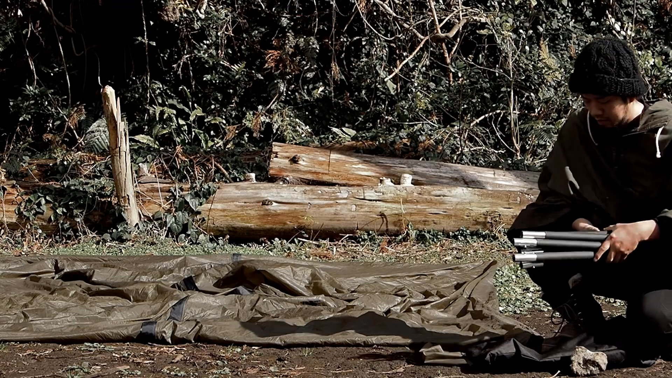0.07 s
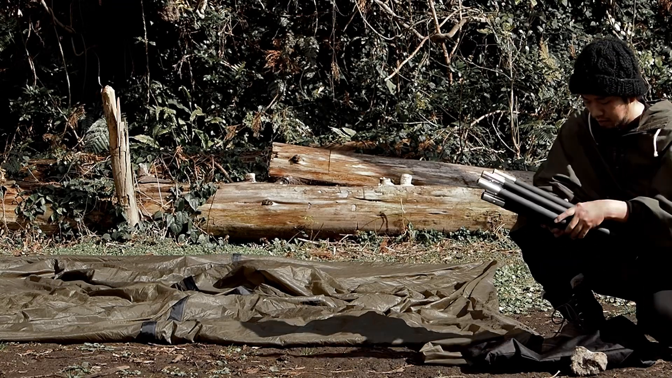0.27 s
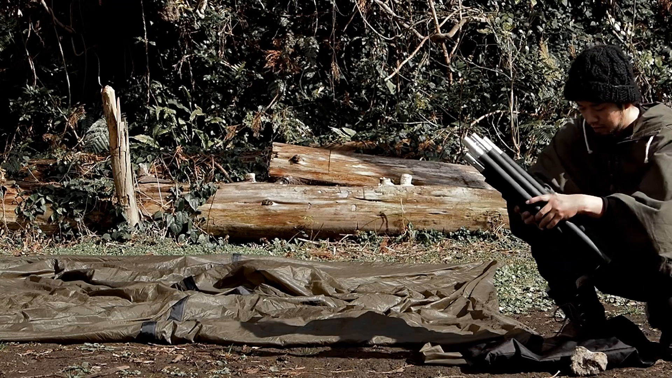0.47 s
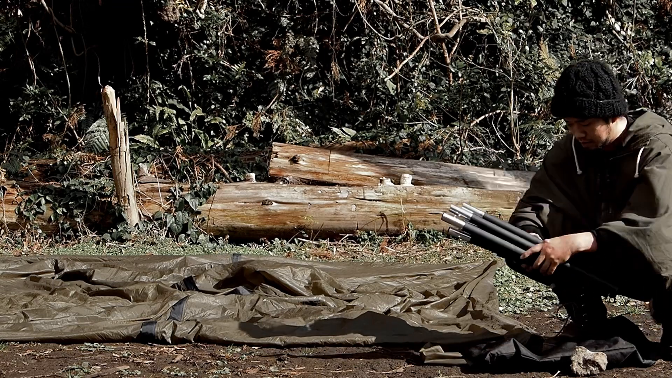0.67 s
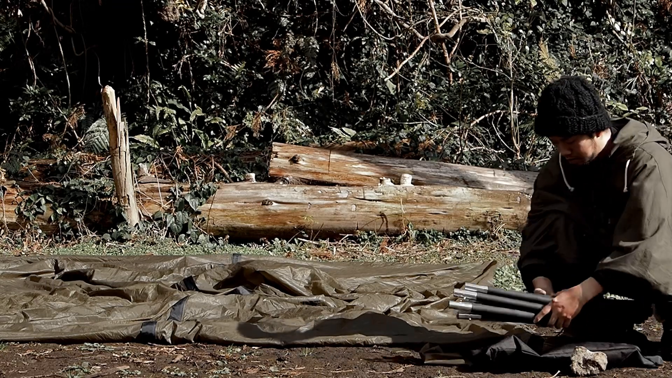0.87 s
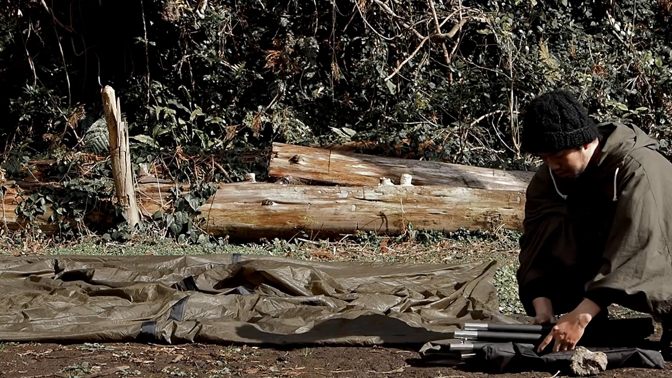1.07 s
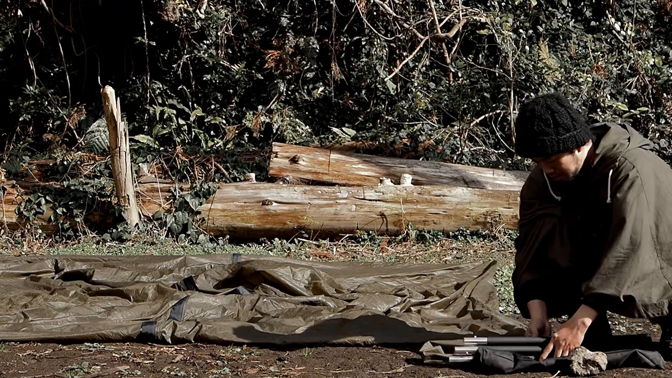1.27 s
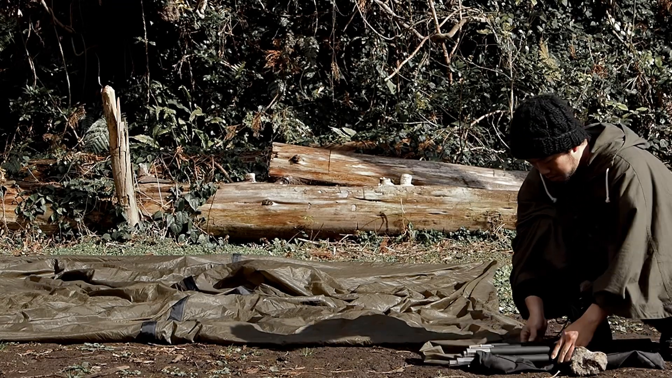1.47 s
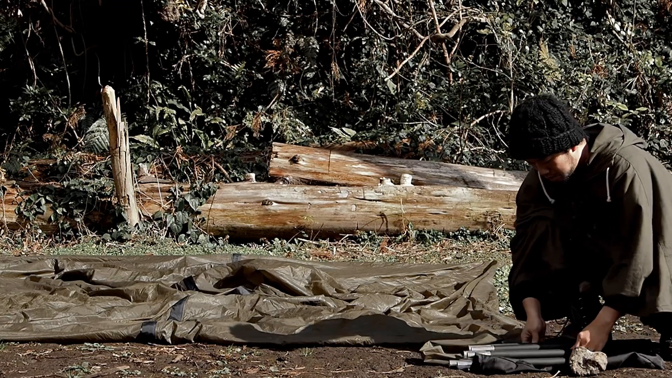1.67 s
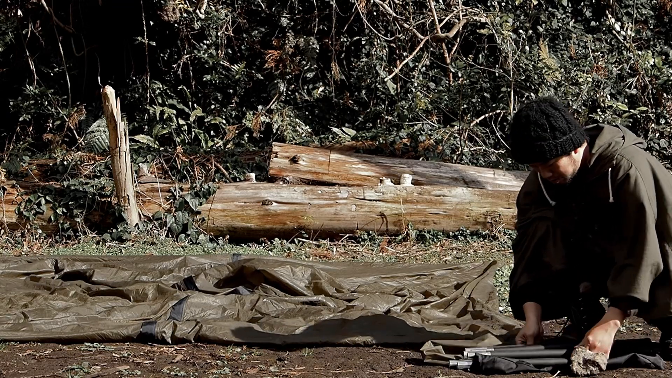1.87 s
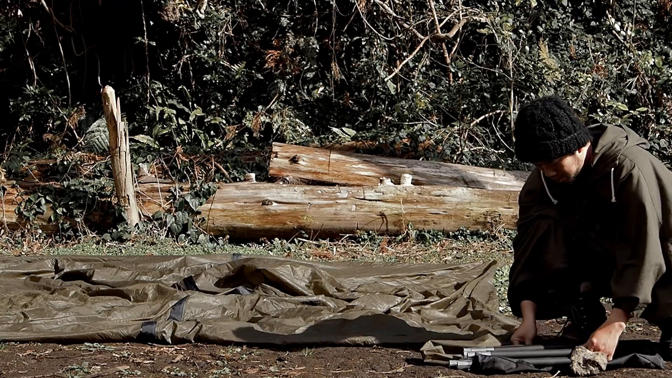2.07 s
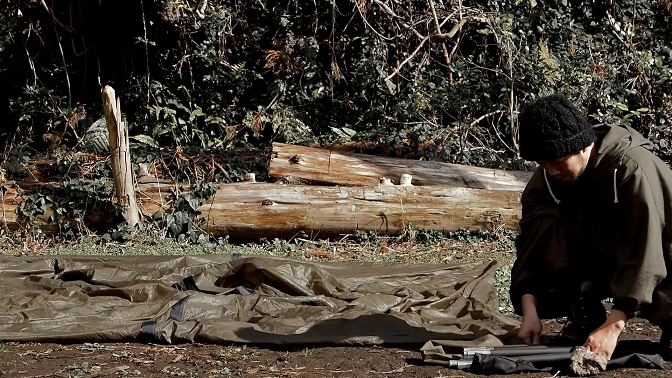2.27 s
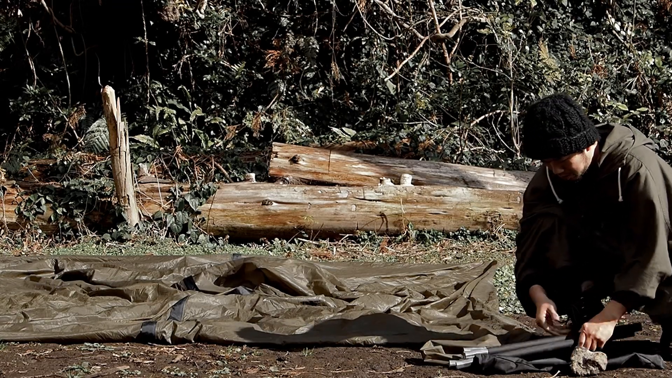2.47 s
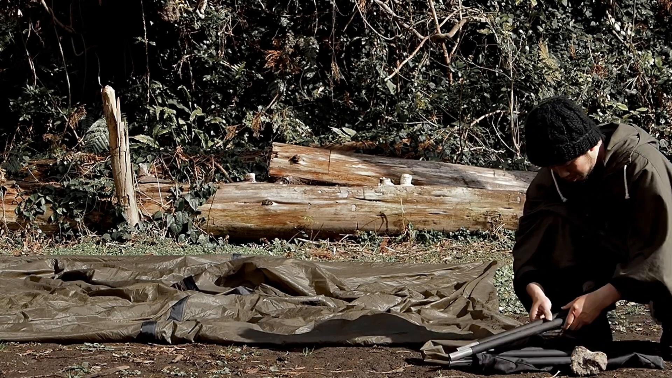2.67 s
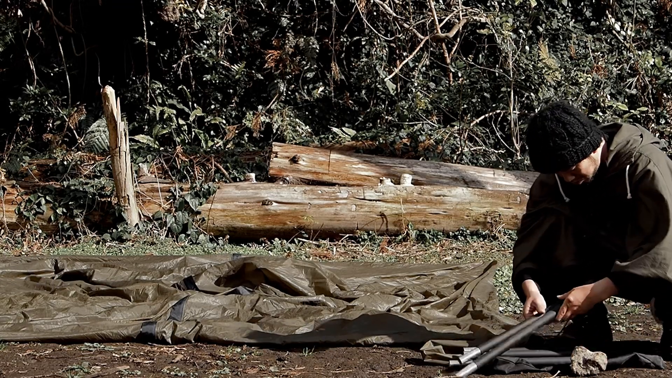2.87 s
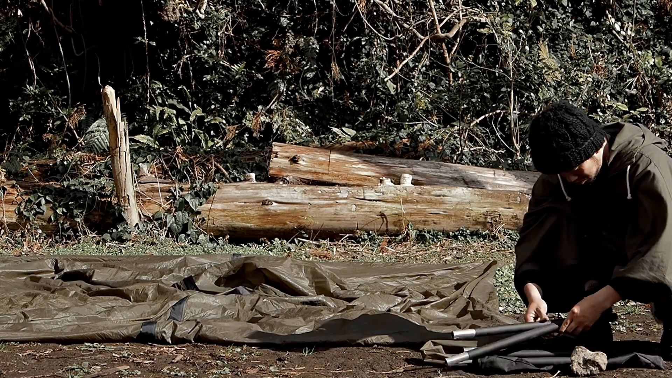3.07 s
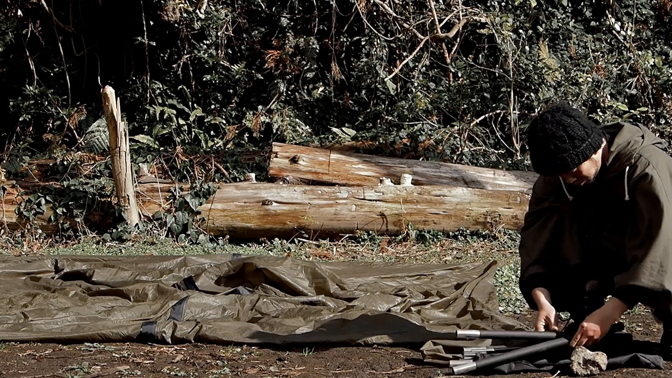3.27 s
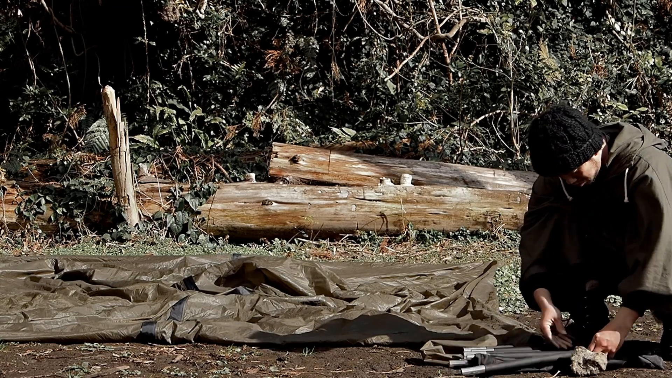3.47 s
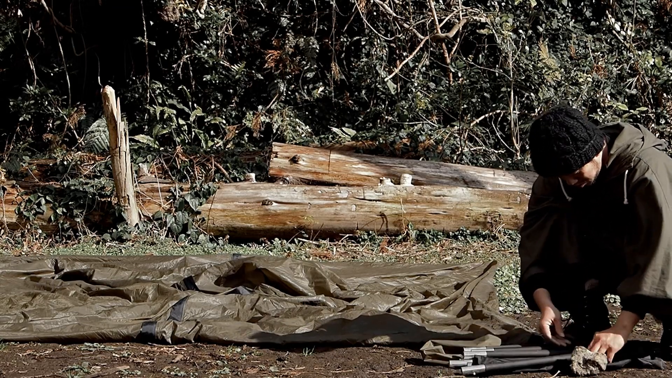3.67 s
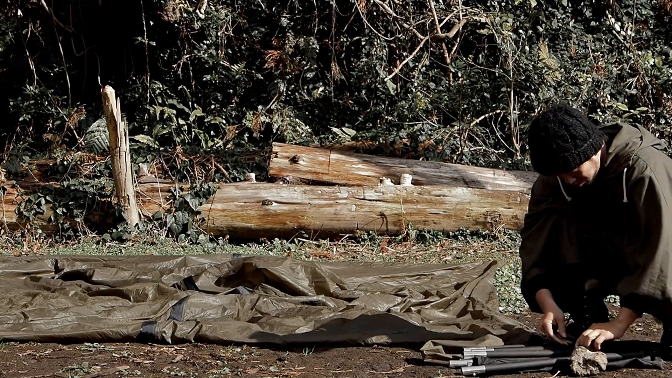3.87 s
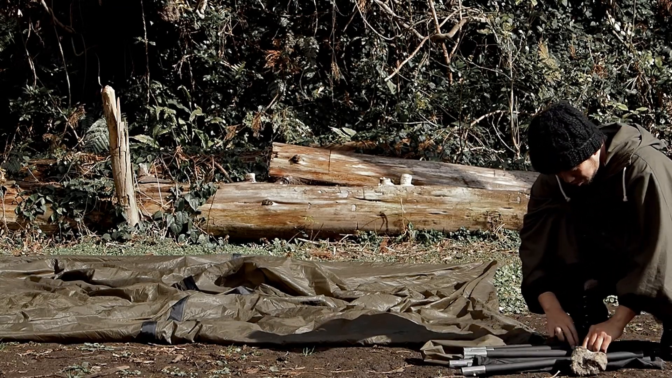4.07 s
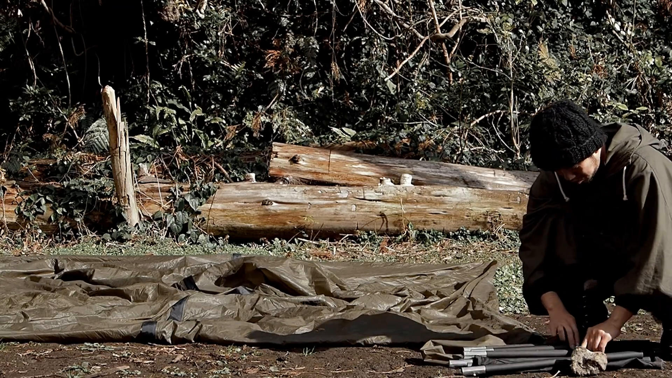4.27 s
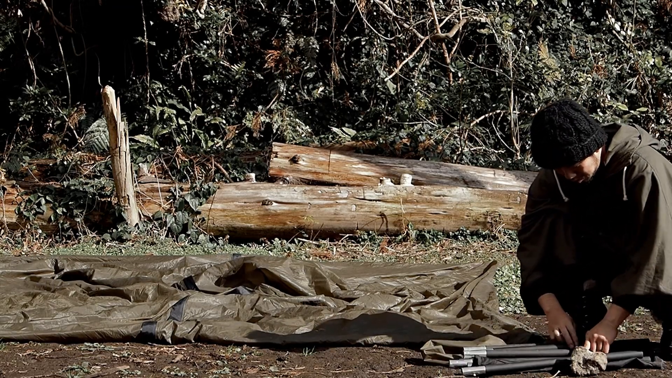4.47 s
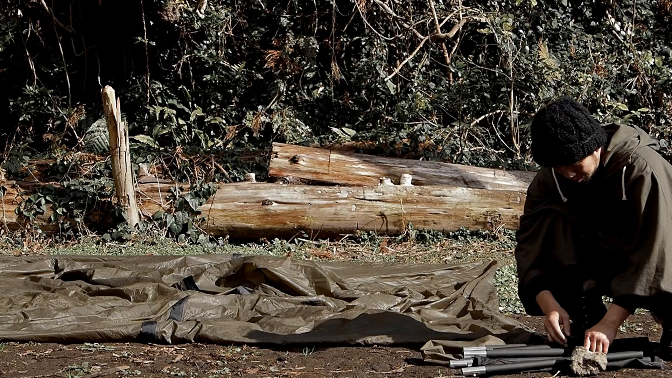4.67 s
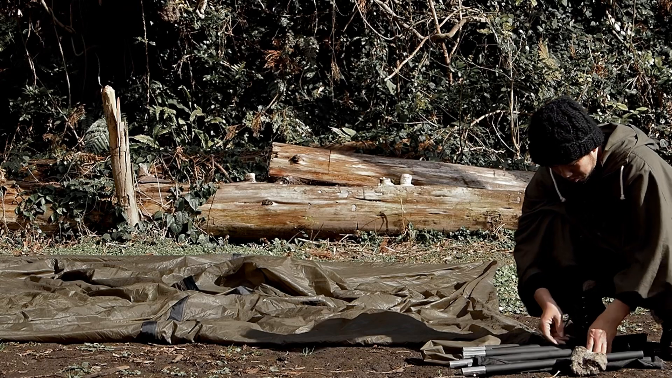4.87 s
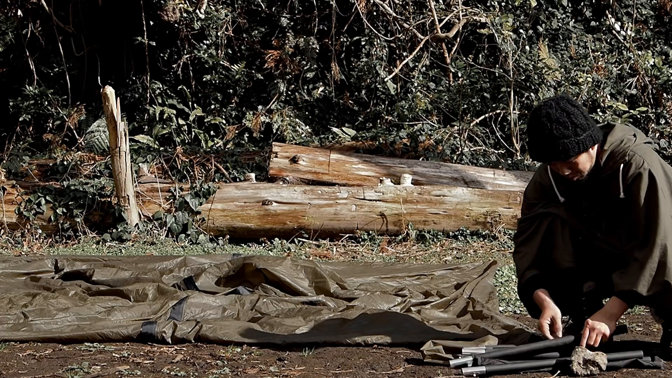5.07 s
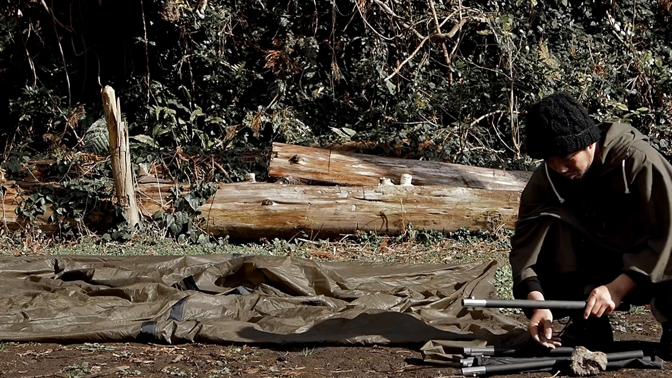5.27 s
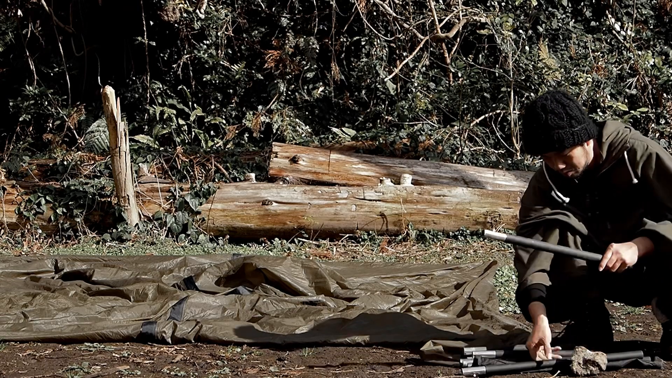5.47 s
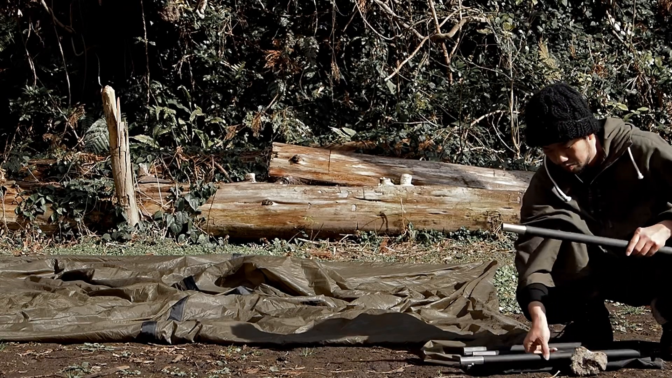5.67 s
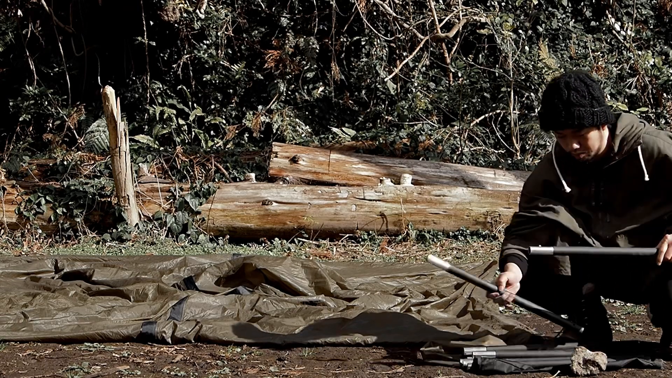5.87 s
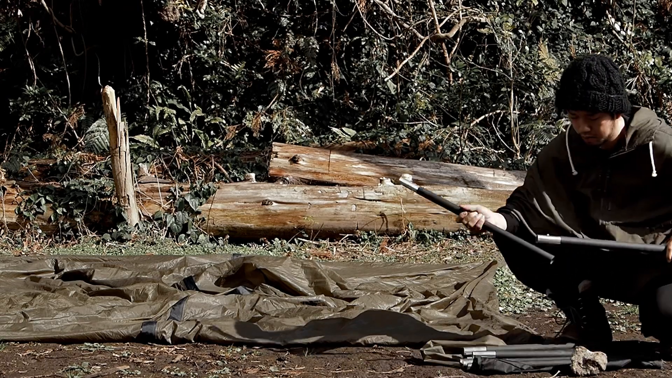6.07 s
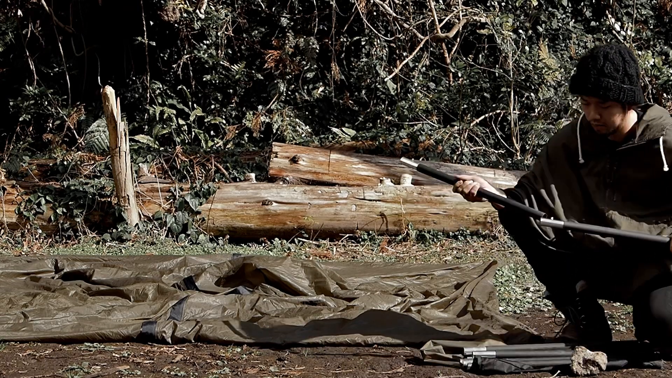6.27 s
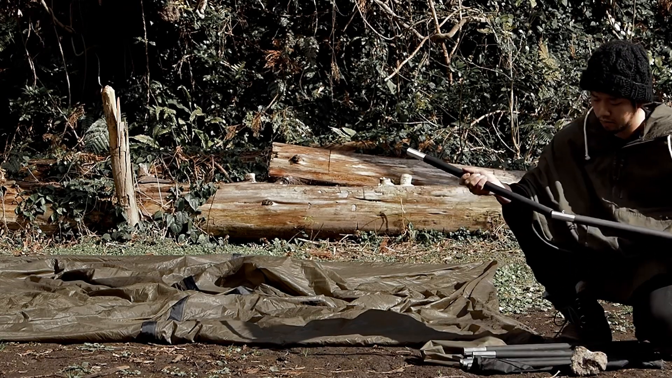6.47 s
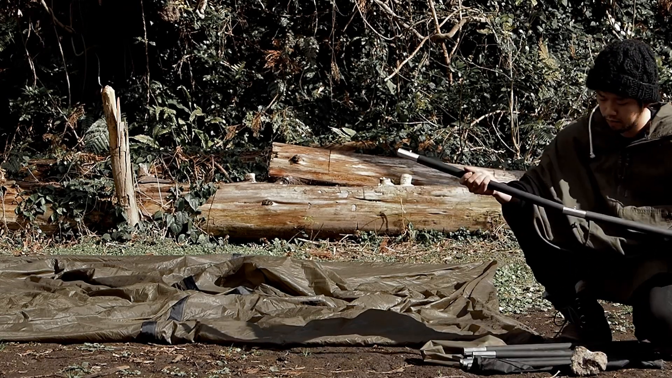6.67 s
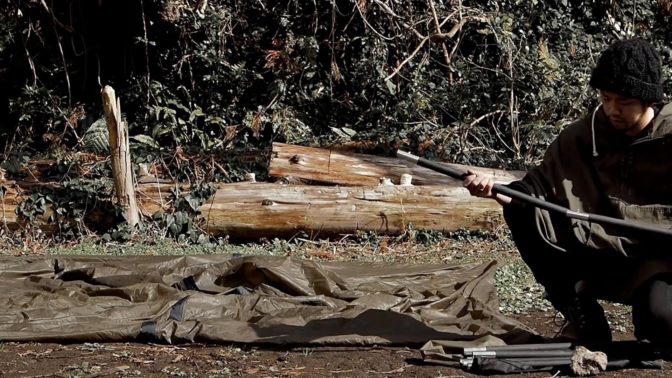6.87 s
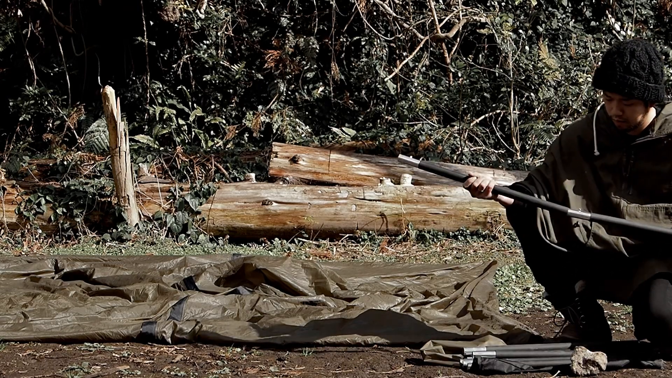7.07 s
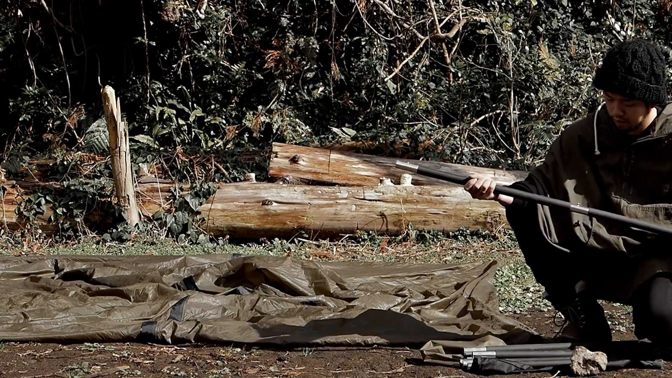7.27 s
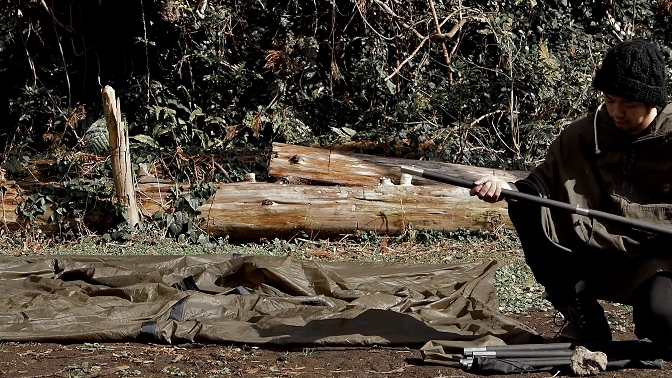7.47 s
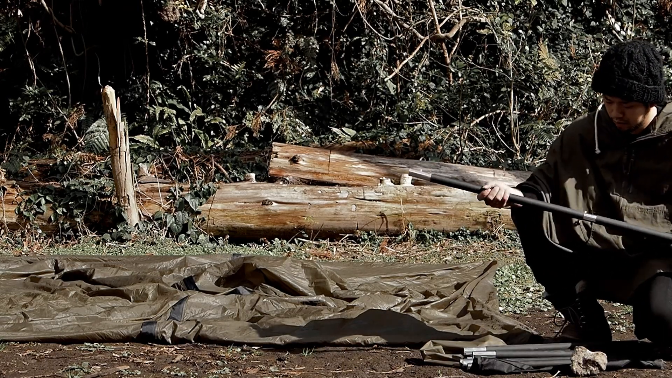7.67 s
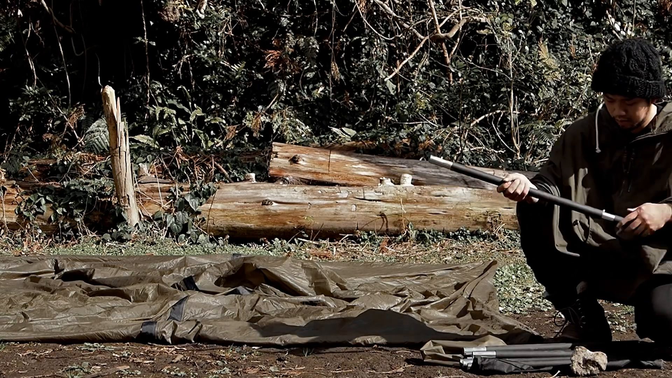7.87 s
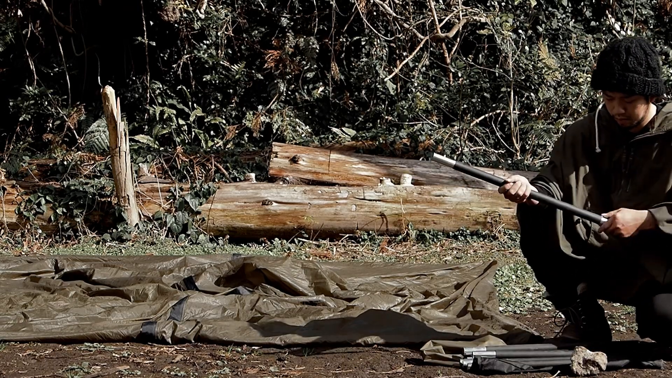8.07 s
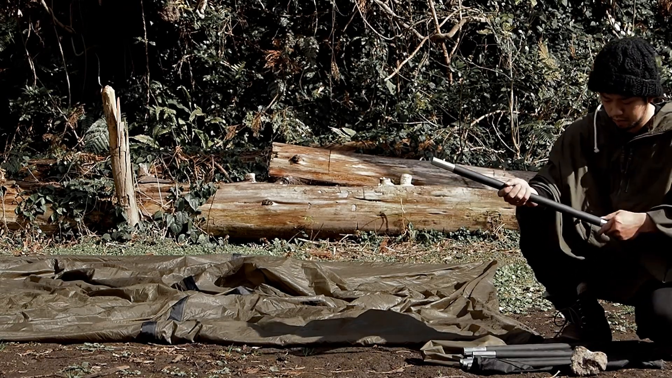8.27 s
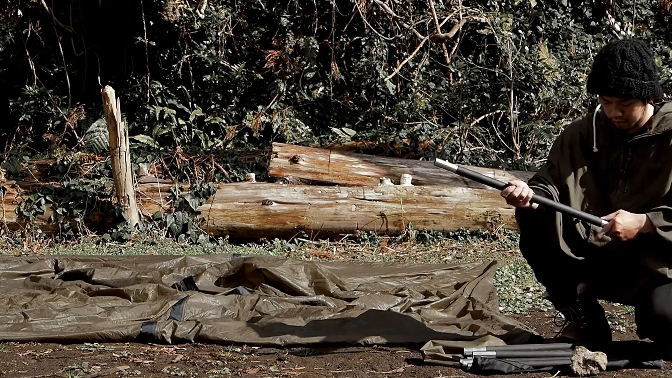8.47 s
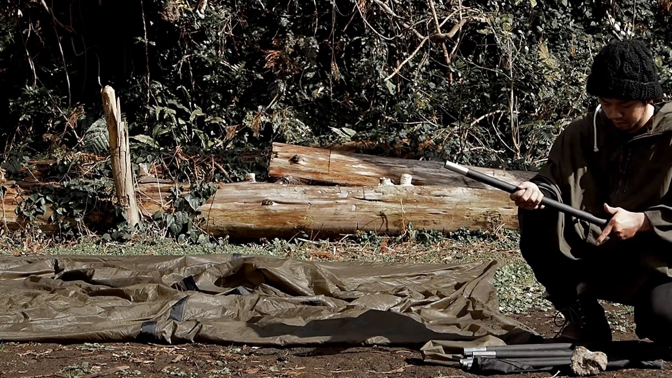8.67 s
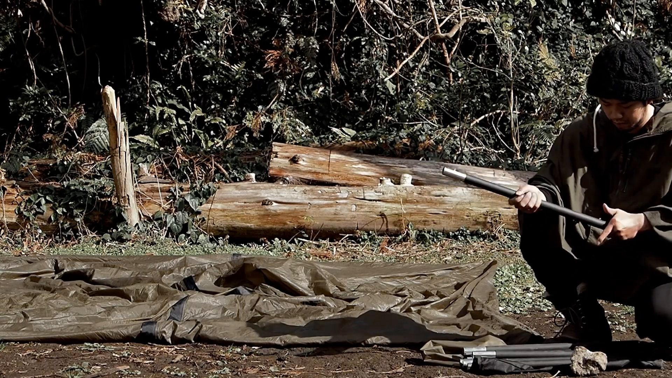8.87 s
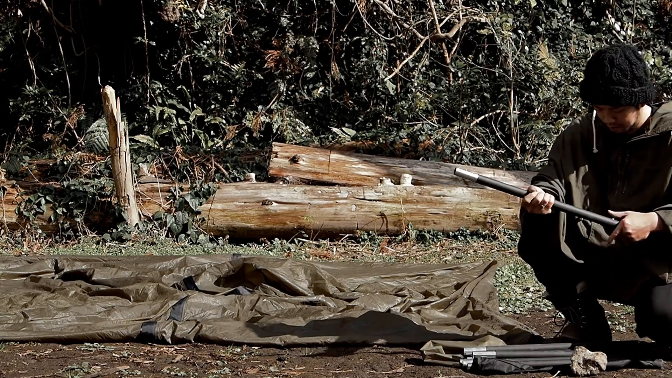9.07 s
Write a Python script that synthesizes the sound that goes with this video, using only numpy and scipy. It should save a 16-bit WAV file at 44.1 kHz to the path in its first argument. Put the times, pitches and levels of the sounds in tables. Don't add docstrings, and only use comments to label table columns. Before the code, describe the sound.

A bundle of thin metal tubes shifts in the hand, then clatters down on cloth-covered ground in a dense, choked rattle. Sparse clinks and rubbing follow as tubes are picked apart, some ringing brightly. Later come faint taps, a dry sliding hiss and sharp joint snaps. A close stereo microphone hears the tubes slightly right, with low wind thumps and soft woodland hiss.

```python
import sys
import numpy as np
from scipy import signal
from scipy.fft import rfft, irfft, next_fast_len
from scipy.io import wavfile
from scipy.ndimage import uniform_filter1d

SR = 44100
rng = np.random.default_rng(int(sys.argv[2]) if len(sys.argv) > 2 else 0)


def gain_from_db(level_db):
    decades = np.asarray(level_db, float) / 20
    return 10 ** decades


def transcribe(signal):
    frames = np.atleast_2d(signal).T
    limited = np.clip(frames, -1, 1)
    pcm = np.round(limited * 32767).astype(np.int16)
    wavfile.write(sys.argv[1], SR, pcm)


N = 402191

# hz, density_db
FLOOR_SPECTRUM = [(35, -33), (60, -22), (199, -7), (290, -2.5), (497, -10.5), (1160, -5.5), (1770, -13.5),
                  (3040, -5), (4030, -9), (10100, -16), (11300, -19.5), (13700, -19.5), (15400, -23.5),
                  (16500, -42)]
# hz, correlation (0 to 1)
FLOOR_LIKENESS = [(100, 0.97), (290, 0.99), (640, 0.63), (1400, 0.22), (3000, 0)]

# peak_s, level_db, fall_s (time to die by 20 dB)
CLOTH_DRAGS = [(0, -73.5, 0.24), (.18, -68, -1), (.49, -80, 1.5), (0.959, -61.5, 0.15), (1.21, -58, 0.37),
               (1.36, -62, 0.6), (1.51, -85, 0.5), (1.92, -71, 0.1), (2.29, -79, 0.64), (2.59, -67.5, 0.35),
               (2.82, -61.5, -0.03), (3.24, -72.5, 0.22), (3.56, -68, 0.3), (3.79, -60, 0),
               (4.37, -83.5, 3.5), (4.81, -67, 0.48), (5.068, -62, 0.39), (5.25, -61, 0.16),
               (5.5, -81, 0.43), (7.47, -72, 0.05), (8.62, -70.5, 0.52)]
# hz, gain_db
CLOTH_COLOUR = [(150, -2), (400, 14), (800, 3.5), (2000, -3.5), (6000, 5.5), (9000, 1.5), (14500, -6)]

# peak_s, level_db, rise_s, fall_s (times over 20 dB)
GRIP_SHIFTS = [
    (.018, -45.5, 5.5, 0.03),
    (.165, -63, 0.1, 0.1),
    (.185, -68, 0.5, -0.35),
    (.28, -82, -9, 12),
    (.485, -62, 0.14, 0.04),
    (7.25, -62, 0.07, .012),
    (7.296, -60, 0.04, 0),
    (7.453, -63, .02, -0.04),
    (4.705, -57, 0.38, 0.06),
]
# pitch_hz, level_db, t60_s
GRIPPED_MODES = [(1550, -2.5, 0.011), (2530, -6, 0.015), (2810, 1.5, 0.015), (3050, -8, 0.016),
                 (3960, -16.5, 0.018), (5490, -8.5, 0.011)]

# peak_s, level_db, rise_s, fall_s (times over 20 dB)
LEFT_PORT_GUSTS = [(.06, -50.5, 0.11, 0.06), (2.02, -54, 0.28, 0.36), (2.33, -45.5, 0.15, 0.19),
                   (2.74, -40, 0.072, 0.17), (3.06, -49.5, 0.12, 0.12), (3.24, -39, 0.06, 0.22),
                   (3.545, -40, 0.06, 0.088), (3.8, -53.5, 0.1, 0.11), (5.02, -46, 0.21, 0.17),
                   (5.27, -50.5, 0.05, 0.087), (7.32, -51, 0.15, 0.042), (7.58, -49.5, 0.12, 0.066)]
RIGHT_PORT_GUSTS = [(.6, -62.5, 0.25, 0.15), (2.19, -52.5, 0.33, 0.1), (2.931, -42, 0.08, .1),
                    (3.07, -39, 0.18, 0.09), (3.25, -56, -0.06, 0.4), (3.5, -55, .08, 0.16),
                    (3.96, -46, -0.14, 0.66), (4.196, -37, 0.19, 0.24), (4.68, -58, .5, .2),
                    (5.42, -36.5, 0.02, 0.14), (5.593, -28, 0.0736, 0.18), (5.967, -46, 0.06, 0.36),
                    (6.169, -46, 0.18, 0.23), (7.95, -58.5, 0.24, 1.2), (8.15, -54, -0.12, 0.5),
                    (8.28, -46.5, 0.2, 0.18), (8.66, -58.5, 0.22, 1.5), (9.08, -50.5, -0.1, .1)]
# hz, gain_db
EDDY_COLOUR = [(15, -21.5), (40, -17.5), (120, 3.5), (250, -1.5), (450, -15.5), (900, -29), (2000, -62)]
# hz, gain_db
SWELL_COLOUR = [(15, -5), (45, 7), (90, 3.5), (160, -11), (400, -61)]

# start_s, middle_ring_db, low_ring_rel_db, high_ring_rel_db, damping (factor)
BUNDLE_RATTLES = [(0.1075, -42, 6, -32, 13), (0.9656, -12.5, -16, -5, 8.1), (1.2428, -34, 8, -20.5, 1.36),
                  (1.2795, -23, -4, 4.5, 4.2), (1.2935, -18, -26, -21, 8.8), (1.4275, -20, -15, -29, 1.5),
                  (1.409, -24.5, -10, -29, 1.4), (1.4955, -15, -3.5, -6, 3.4), (1.9047, -36, 0, -22, 6.2),
                  (2.1316, -37.5, -14, -10.5, 1.9), (2.275, -37, -11, -3.5, 1.75),
                  (2.6828, -58, -17, 1, 0.89), (3.79, -30, -12, -23, 1.7), (4.0792, -42, 5.5, -10, 7.8),
                  (4.4338, -35, -13, -18.5, 1.9), (4.7036, -58.5, 20.5, 4, 12),
                  (4.8001, -30.5, -7, -25, 1.5), (4.9082, -24.5, -17, -18, 1.4)]
BUNDLE_CLANKS = [(4.6057, -44.5, -12, -24, 2.1), (1.1935, -23.5, 6, 0.5, 6.1), (1.2027, -27, 0, -17, 3.3),
                 (1.3114, -27.5, -13, -16, 1), (1.3822, -19, -13, -17, 3.2), (1.4893, -17, -6, -2, 2.1),
                 (1.6179, -24, -45, -13, 6.5), (2.6, -36, -5, -61, 4.7), (3.0146, -56, 6, -11, 3.5),
                 (3.538, -18, -10.5, -2.5, 3.9), (3.7202, -47, 3, -24, 3.2), (3.7671, -28, -13, 1.5, 0.9),
                 (4.9682, -41.5, -19, -1.5, 0.31), (5.1471, -32, 0, -48, 4.4), (5.3895, -24.5, -9, -6, 2.4)]
BUNDLE_CLINKS = [
    (1.4077, -24, -10, -20, 2.5),
    (1.4272, -25.5, -12, -29, 2),
    (4.5166, -43.5, -17, -4, 1.0),
    (3.5914, -32.5, -11, -16, 1.16),
    (4.8636, -52, -19, -20, 2),
    (5.0693, -45, -8.5, -8, 0.91),
    (5.199, -35.5, -20, -8.5, 1.5),
    (5.25, -50.5, 11.5, -20.5, 0.45),
    (5.4006, -34.5, -9, -11.5, 1.9),
]
BUNDLE_TICKS = [(1.3887, -24, -14, -6, 5.9), (1.4985, -35, 14, -11, 3.9), (1.6065, -41, 1, -1, 3),
                (1.6237, -31, -20, -23, 4.1), (1.9091, -42, -7, -20, 1.7), (2.2244, -64, -20, -14, 2.3),
                (4.0998, -45, -4, 1.5, 2.8), (4.1971, -52, -22, 11.5, 1.1), (4.6262, -47.5, 3, -16, 3.4),
                (5.003, -34.5, -3, -1, 2.8), (5.0432, -37, -0.5, -16, 2.3), (5.2115, -35.5, -15, -21, 2.6),
                (5.4473, -37.5, -12, -1, 1.6), (5.5765, -46, -8, -11, 1.5), (5.7215, -44, -5, -11.5, 2.3),
                (5.733, -61, -20, 2, 1.9)]
EDGE_KNOCKS = [
    (4.8154, -25.5, -16, -13, 4),
    (5.2263, -21, -23, -5.5, 0.85),
    (5.3889, -23, -27, -14, 1.15),
    (3.5355, -21, -16, -6.5, 2.4),
    (5.1985, -25, -18.5, -17, 2.1),
]
HELD_TAPS = [
    (6.3035, -43.5, 1.3, -17, 0.89),
    (6.333, -52.5, 2, -22, 0.84),
    (6.4435, -43, 3.6, -10, 1.02),
    (6.4963, -45, 0.8, -11, 1),
]
JOINT_SNAPS = [
    (7.2493, -55, -19, 3, 0.66),
    (7.2933, -44.5, -21, -8.5, 2.3),
    (7.4465, -55.5, -22, 2.5, 0.37),
    (7.4903, -35, -6, -6, 1.08),
    (8.2468, -53.5, -6, -7, 1.5),
    (8.6212, -33, -14, 4, 1.06),
    (8.7274, -80.5, -13, 26, 2.8),
    (8.757, -38, 4.5, 14, 2.4),
]

BUNDLE_MODES = [(985, -6, .05), (1390, 0, .035), (1351, -8, .2), (1425, -12, .15), (1750, 0, .008),
                (2620, 0, .038), (2250, -14, .03), (2347, -17, .15), (2468, -10, .3), (2510, -8, .12),
                (2980, -1, .016), (3850, -13, .1), (720, -4, .018), (5600, 0, .015), (7100, -2, .01),
                (14300, -3, .004), (9370, -22, .1), (5000, -22, .17), (5117, -17, .17), (5310, -16, .17),
                (5480, -16, .12), (5636, -12, .11), (6230, -21, .08), (6930, -17, .05), (7310, -19, .05)]
FREE_MODES = [(1310, 0.5, 0.046), (2484, -1, 0.11), (2536, -8, 0.087), (2860, 6.5, .01), (3250, 1, 0.0053),
              (3780, -15.5, .05), (5144, -7, 0.11), (5480, -5, .04), (5370, -6.5, .06), (6260, -12, .08),
              (7150, -5, .008), (10500, 3.5, 0.0033)]
HELD_MODES = [(1347, -5, .17), (1394, -6, 0.035), (1680, 3, 0.015), (1850, 2.5, 0.0084), (2270, 4.5, 0.019),
              (2680, -8.5, 0.038), (3440, 1, 0.011), (5030, -2, 0.24), (5500, 8, 0.01), (7200, 8, 0.016)]
JOINED_MODES = [(600, -2.5, 0.061), (1265, -4.5, 0.031), (2850, -5, 0.015), (3800, 16.5, 0.0023),
                (1860, -8, 0.011), (5700, 2, 0.0058), (3230, 0, 0.017), (12500, -11, 0.01)]
# hz, gain_db
CRACK_COLOUR = [(150, -35), (500, -38), (1500, -17.5), (3500, -12.5), (6000, 9), (9000, -1.5),
                (14000, -1.5)]

# start_s, level_db, pitch_hz
BIRD_CALLS = [
    [(.72, -95.5, 3050), (.76, -85.5, 3650), (.85, -86, 3720), (1.0, -95, 3950)],
    [(6.05, -103, 3320), (6.15, -104, 3600), (6.3, -94, 3460)],
    [(6.6, -99, 3420), (6.95, -96.5, 3090)],
    [(8.8, -87, 3870), (8.92, -87.5, 4100), (8.94, -81, 3540), (9.0, -87.5, 4100), (9.03, -80, 3390),
     (9.065, -73, 4360), (9.15, -77, 4500)],
]

# peak_s, level_db, rise_s, fall_s (times over 20 dB)
GROUND_SCRAPES = [
    (.96, -49.5, 0, 0.06),
    (1.162, -48, 0.07, 0.66),
    (1.504, -53, 0.5, 0.17),
    (1.77, -64, -0.8, 0.16),
    (1.915, -52, 0.1, 0.08),
    (4.82, -55, 0.21, 0.12),
    (3.54, -53, .01, 0.13),
    (.93, -51, 0, .05),
    (8.632, -58, 0.04, 0.04),
    (2.6, -57, 0.12, -0.02),
]
# pitch_hz, level_db, t60_s
HOLLOW_MODES = [(673, -7, 0.027), (982, -2, 0.018), (1200, -4, .02), (1546, -2, 0.0087)]

# peak_s, middle_ring_db, rise_s, fall_s (times over 20 dB), outer_ring_reach_db
LAYING_RUBS = [(.96, -58.5, 0.08, 0.2, 0), (1.176, -54, 0.02, 0.03, 0), (1.2, -41, -0.0472, -0.1239, 4),
               (1.245, -43, 0.1043, 0.13, -20), (1.29, -34, 0.0028, 0.0229, -1.5),
               (1.315, -42, 0.0543, 0.06, -8), (1.333, -42, 0.0657, 0.04, -9),
               (1.355, -45.5, 0.0761, 0.07, 1), (1.387, -34.5, 0.0149, 0.0167, -6.5),
               (1.41, -38, 0.0358, 0.03, -15), (1.432, -41, 0.0239, 0.01, -8),
               (1.47, -39.5, 0.05, 0.0173, -7), (1.515, -43.5, 0.0449, 0.1157, -0.5),
               (1.61, -45, 0.01, 0.0745, -8), (1.625, -75, 2, 0.5, -19), (1.73, -57, .05, 0.35, -6.5),
               (1.912, -54.5, 0.05, 0.15, -5.5)]
PICKING_RUBS = [(2.22, -66.5, 0.15, 0.066, -4), (2.285, -59.5, 0.045, 0.079, 4),
                (2.57, -54.5, 0.072, 0.048, -12), (2.607, -64, .02, 0.028, -15),
                (2.695, -59.5, 0.026, 0.069, -6), (2.8, -59.5, 0.13, 0.11, 2.5),
                (2.843, -54, 0.04, 0.067, 2.5), (3.065, -57.5, 0.075, 0.057, -1),
                (3.088, -53, 0.054, 0.045, -9.5), (3.25, -44.5, 0.039, 0.02, -5),
                (3.325, -54.5, 0.042, 0.044, -15), (3.56, -56, 0.031, 0.31, -17),
                (3.792, -55.5, 0.02, 0.1, 6.5), (4.2, -60.5, 0.091, .3, -1), (4.53, -59, 0.042, 0.047, 3.5),
                (4.63, -59, 0.036, 0.22, -20), (4.78, -52.5, 0.074, 0.073, -14.5),
                (4.865, -48, 0.079, 0.13, -38), (4.985, -46.5, 0.035, .04, -4),
                (5.008, -50.5, .03, 0.072, 2), (5.075, -43.5, 0.054, 0.031, -1.5),
                (5.115, -47.5, 0.047, 0.033, 6), (5.17, -57.5, 0.044, 0.09, -12.5),
                (5.25, -49.5, 0.052, 0.11, 4.5), (5.3, -53.5, 0.07, 0.095, -13),
                (5.422, -45.5, 0.043, 0.071, -1.5), (5.45, -55.5, .03, 0.06, -6),
                (5.55, -56, 0.035, 0.066, -11), (5.585, -62, 0.02, 0.067, -11),
                (5.733, -57.5, 0.12, 0.063, -1), (7.27, -76.5, 0.066, .05, 13.5),
                (7.47, -67, 0.016, 0.032, 4), (8.625, -65, 0.06, 0.1, 9)]
# pitch_hz, level_db, t60_s
JOSTLED_MODES = [(1090, -5, .02), (1308, -4, .03), (1380, -3, 0.036), (1577, -1.5, 0.026),
                 (2424, -4.5, 0.031), (2538, 1.5, 0.037), (2649, -2, 0.048), (2920, -4, 0.017),
                 (3815, -9.5, 0.057), (5360, -5.5, 0.037), (5710, -5.5, 0.0095), (6800, -5.5, 0.0083),
                 (9800, -3, 0.0045), (13500, -0.5, 0.0034)]
# pitch_hz, level_db, t60_s
RUBBED_MODES = [(1060, -8.5, 0.034), (1354, -9.5, 0.14), (1402, 0.5, 0.04), (1550, 3, 0.014),
                (2358, -24.5, 0.065), (2490, -2, 0.089), (2532, 0.5, 0.034), (2650, -7, 0.013),
                (3826, -10.5, 0.08), (5110, -6, 0.064), (5370, -4, 0.055), (5640, 1, 0.013),
                (5545, -7.5, 0.058), (6350, -2.5, 0.039), (13400, 5, 0.0024)]

# start_s, end_s, level_db
FERRULE_SLIDES = [
    (7.583, 7.973, -59),
    (8.5, 8.908, -59),
]
# hz, gain_db
SLIDE_COLOUR = [(4600, -25), (5500, 4), (6600, -11), (11500, -6.5), (14800, -8)]

# hz, gain_db
NEAR_BASS_CUT = [(120, -45), (500, -15), (800, -5), (1100, 0)]
# hz, left_minus_right_db
LEFT_SHADE = [(300, 3.5), (1300, -0.5), (2400, 1), (4400, -3.5), (8100, -13.5), (15000, -12.5)]
# hz, left_lead_rad
LEFT_LEAD = [(100, -.04), (500, -.2), (1500, -.58), (3000, -1.15), (5500, -2.1), (8100, -3.15),
             (12800, -4.4), (16000, -4.2)]
# hz, gain_db
MIC_COLOUR = [(4100, 0), (4550, -9), (4900, 0), (7600, 0), (8300, -5), (9100, 0), (10900, 0), (11400, -7),
              (11900, 0), (15900, 0), (16400, -18), (16800, -80)]


def evened(x):
    return x / np.sqrt(np.mean(x ** 2) + 1e-20)


def read(points, hz):
    f, value = np.transpose(points)
    return np.interp(np.log(hz + 1), np.log(f + 1), value)


def coloured(x, points, turn=((1, 0), (2, 0))):
    size = next_fast_len(N)
    hz = np.fft.rfftfreq(size, 1 / SR)
    response = gain_from_db(read(points, hz)) * np.exp(1j * read(turn, hz))
    return irfft(rfft(x, size) * response, size)[..., :N]


def slow(smooth_s):
    size = max(int(smooth_s * SR), 1)
    once = uniform_filter1d(rng.standard_normal(N), size)
    return evened(uniform_filter1d(once, size))


def surges(peak_s, level_db, rise_s, fall_s, rest_db=-110):
    t = np.arange(0, N / SR + .004, .004)[:, None]
    rising = (peak_s - t) / np.maximum(rise_s, .01)
    falling = (t - peak_s) / np.maximum(fall_s, .01)
    each_db = level_db - 20 * np.maximum(rising, falling)
    power = (gain_from_db(each_db) ** 2).sum(1) + gain_from_db(rest_db) ** 2
    return np.interp(np.arange(N) / SR, t[:, 0], 10 * np.log10(power))


def rings(modes, damping=1.0, luck=0):
    bloom_cycles = 1.3
    t = np.arange(SR // 5) / SR
    out = np.zeros((3, len(t)))
    for (hz, db, t60), (reach, detune) in zip(modes, luck + np.zeros((len(modes), 2))):
        family = np.searchsorted([2000, 4500], hz)
        u = t[:int(SR * t60 / damping)]
        decay = gain_from_db(db + 3.0 * reach - 60 * u * damping / t60)
        bloom = 1 - np.exp(-u * hz / bloom_cycles)
        out[family, :len(u)] += decay * bloom * np.sin(2 * np.pi * hz * (1 + .01 * detune) * u)
    return out


def woodland():
    frames, hz = N // 256 + 5, np.fft.rfftfreq(1024, 1 / SR)
    a, b, c, d, patches = rng.standard_normal((frames, 513, 5)).T
    patches = evened(uniform_filter1d(uniform_filter1d(patches, 12, 0), 14, 1))
    same = np.clip(read(FLOOR_LIKENESS, hz), -1, 1)[:, None]
    left = a + 1j * b
    right = same * left + np.sqrt(1 - same ** 2) * (c + 1j * d)
    spectrum = np.array([left, right]) * gain_from_db(read(FLOOR_SPECTRUM, hz)[:, None] + 2.2 * patches)
    hiss = signal.istft(spectrum, nperseg=1024, noverlap=768)[1][:, :N]
    return gain_from_db(-68.5 + 3.0) * evened(hiss)


def cloth():
    peak_s, level_db, fall_s = np.transpose(CLOTH_DRAGS)
    grains = rng.standard_normal(N) * gain_from_db(2.5 * slow(.0015) + 2.5 * slow(.02))
    drag_db = surges(peak_s, level_db, 0.35 * fall_s, fall_s)
    return gain_from_db(drag_db + 16.5) * evened(coloured(grains, CLOTH_COLOUR))


def chafing(rows, modes):
    ring = rings(modes).sum(0)
    contacts = rng.standard_normal(N) * gain_from_db(surges(*np.transpose(rows)) + 3.0 * slow(0.0037))
    return signal.oaconvolve(contacts, ring / np.linalg.norm(ring))[:N]


def wind():
    out = []
    for gusts in (LEFT_PORT_GUSTS, RIGHT_PORT_GUSTS):
        gust_db = surges(*np.transpose(gusts), rest_db=-99)
        eddies = rng.standard_normal(N) * gain_from_db(5.0 * slow(.011))
        swells = rng.standard_normal(N) * gain_from_db(1.84 * slow(0.013))
        thumps = gain_from_db(gust_db - 0.5) * evened(coloured(eddies, EDDY_COLOUR))
        dark = gain_from_db(0.5 * gust_db - 28.5) * evened(coloured(swells, SWELL_COLOUR))
        out.append(thumps + dark)
    return np.array(out)


def strikes(events, chatter_ms, modes, first_contact, crack_db, variety):
    ringing, cracks = np.zeros(N + SR), np.zeros(N + SR)
    fade = np.arange(4000) / SR / max(chatter_ms / 1000, 1e-4)
    for start_s, db, low_db, high_db, damping in events:
        sign, size = rng.standard_normal((2, 4000))
        luck = rng.standard_normal((len(modes), 2))
        uneven_db = 5.7 * uniform_filter1d(size, 30) * np.sqrt(30)
        chatter = sign * gain_from_db(uneven_db - 20 * fade) * np.minimum(fade / 0.078, 1)
        chatter /= np.linalg.norm(chatter)
        chatter[0] += first_contact
        family_gain = gain_from_db(db + np.array([low_db - 1.0, -4, high_db]))
        ring = family_gain @ rings(modes, max(damping, .4), variety * luck)
        sound = signal.fftconvolve(chatter, ring)
        start = round(start_s * SR)
        ringing[start:][:len(sound)] += sound
        cracks[start:][:4000] += gain_from_db(db + high_db + crack_db) * chatter
    return ringing[:N] + coloured(cracks[:N], CRACK_COLOUR)


def bundle_strikes():
    rattles = strikes(BUNDLE_RATTLES, 19.4, BUNDLE_MODES, .2, crack_db=-42.0, variety=0.76)
    clanks = strikes(BUNDLE_CLANKS, 8.5, BUNDLE_MODES, .3, crack_db=-42.0, variety=0.76)
    clinks = strikes(BUNDLE_CLINKS, 5.9, BUNDLE_MODES, .45, crack_db=-42.0, variety=0.76)
    ticks = strikes(BUNDLE_TICKS, 11, BUNDLE_MODES, 0.67, crack_db=-27.0, variety=0.83)
    return rattles + clanks + clinks + ticks


def birds():
    out = np.zeros((2, N))
    for rows, blur_hz, overtone_db in zip(BIRD_CALLS, (200, 450, 500, 450), (-12, -30, -30, -18)):
        start_s, level_db, pitch_hz = np.transpose(rows)
        t = np.arange(start_s[0], start_s[-1], 1 / SR)
        phase = 2 * np.pi * np.cumsum(np.interp(t, start_s, pitch_hz)) / SR
        blur = rng.standard_normal((2, len(t))) + 1j * rng.standard_normal((2, len(t)))
        blur = signal.lfilter(*signal.butter(2, blur_hz / 2, fs=SR), blur)
        whistle = np.exp(1j * phase) + gain_from_db(overtone_db) * np.exp(2j * phase)
        tone = evened((blur * whistle).real)
        call = gain_from_db(np.interp(t, start_s, level_db) + 27.0) * tone * signal.windows.tukey(len(t), .15)
        part = out[:, round(start_s[0] * SR):][:, :len(t)]
        part += call[:, :part.shape[1]]
    return out


def rubbing():
    out = np.zeros(N)
    contacts = [rng.standard_normal(N) * gain_from_db(3.0 * slow(.004) + 1.2 * slow(.02)) for family in range(3)]
    for rows, modes in ((LAYING_RUBS, JOSTLED_MODES), (PICKING_RUBS, RUBBED_MODES)):
        peak_s, level_db, rise_s, fall_s, reach_db = np.transpose(rows)
        lifts_db = (-7 + 0.34 * reach_db, 0, reach_db)
        for ring, touch, lift_db in zip(rings(modes), contacts, lifts_db):
            rub = touch * gain_from_db(surges(peak_s, level_db + lift_db, rise_s, fall_s))
            out += signal.oaconvolve(rub, ring / np.linalg.norm(ring))[:N]
    return out


def sliding():
    hiss = evened(coloured(rng.standard_normal(N) * gain_from_db(0.72 * slow(0.0082)), SLIDE_COLOUR))
    t, stroke = np.arange(N) / SR, np.zeros(N)
    for start_s, end_s, level_db in FERRULE_SLIDES:
        along = np.clip((t - start_s) / (end_s - start_s), 0, 1)
        stroke += gain_from_db(level_db) * np.sqrt(np.sin(np.pi * along) + 1e-9)
    return hiss * stroke


def ports(x):
    t = np.arange(SR // 4) / SR
    scatter = rng.standard_normal((3, len(t))) * gain_from_db(-60 * t / 0.091) * (t > .003)
    scatter /= np.linalg.norm(scatter[0])
    ground, *around = signal.oaconvolve(x[None], scatter, axes=1)[:, :N]
    near = x + gain_from_db(-18.0) * ground
    direct = np.array([coloured(near, LEFT_SHADE, LEFT_LEAD), near])
    return gain_from_db(3.0) * direct + gain_from_db(-13) * np.array(around)


def scene():
    far = woodland() + wind() + birds()
    near = cloth() + chafing(GRIP_SHIFTS, GRIPPED_MODES) + bundle_strikes()
    near += chafing(GROUND_SCRAPES, HOLLOW_MODES) + rubbing()
    near += strikes(EDGE_KNOCKS, 5.2, FREE_MODES, 1.0, crack_db=-27, variety=0.41)
    near += strikes(HELD_TAPS, 1.4, HELD_MODES, 1.3, crack_db=-28, variety=.2)
    near += strikes(JOINT_SNAPS, 5.5, JOINED_MODES, 0.91, crack_db=23.0, variety=1.0)
    near += sliding()
    return ports(coloured(near, NEAR_BASS_CUT)) + far


def low_pass(x):
    return signal.sosfilt(signal.butter(12, 16820, fs=SR, output="sos"), x)


def record(dry):
    mix = coloured(dry, MIC_COLOUR)
    return low_pass(mix)


dry = scene()
out = record(dry)
transcribe(out)
```